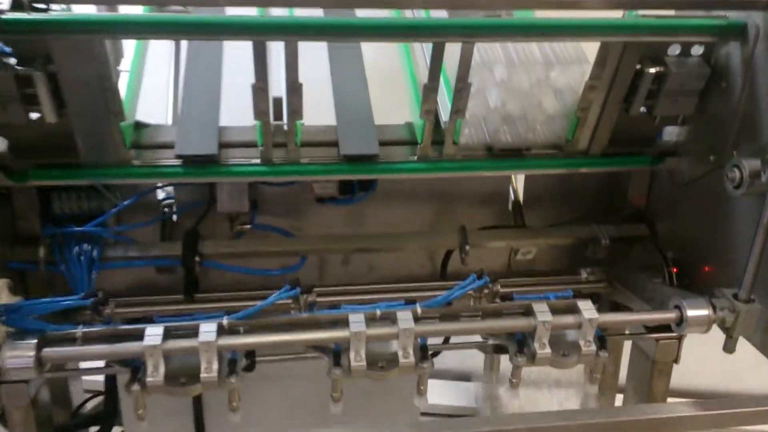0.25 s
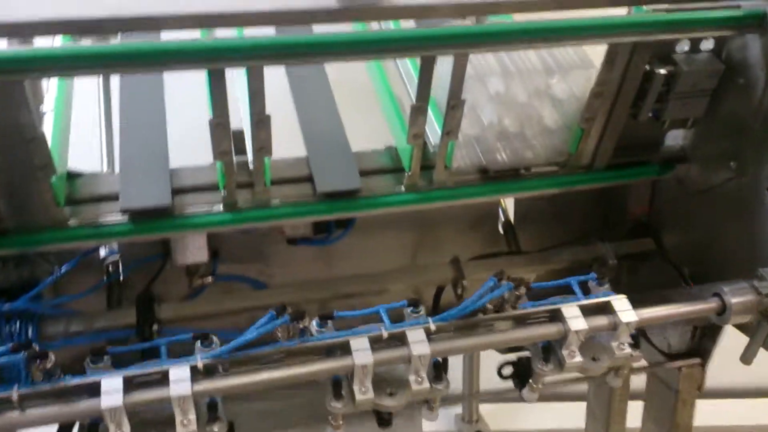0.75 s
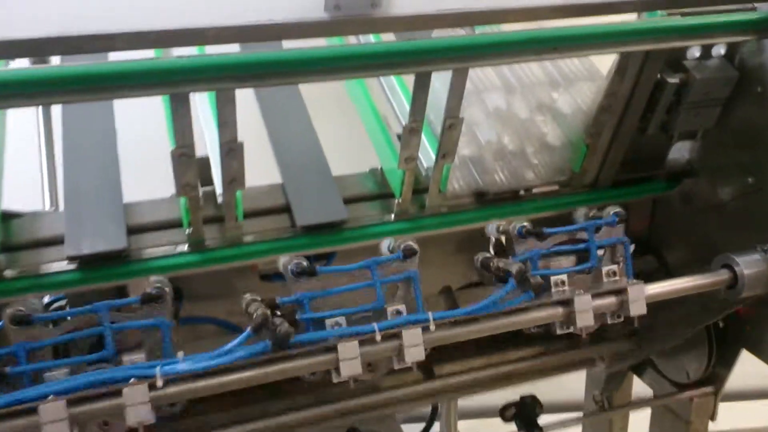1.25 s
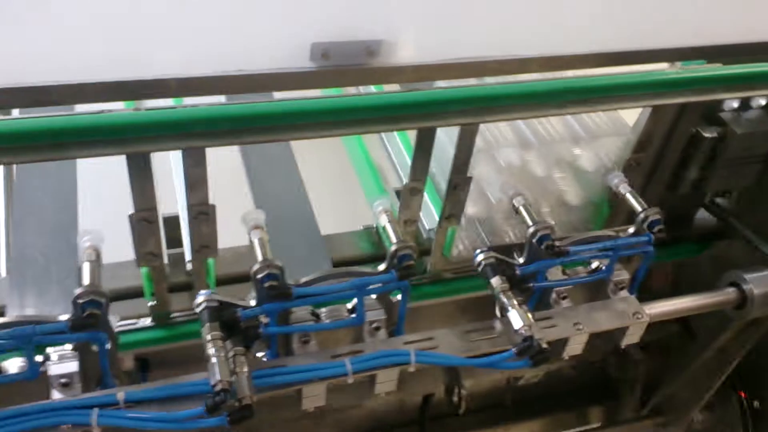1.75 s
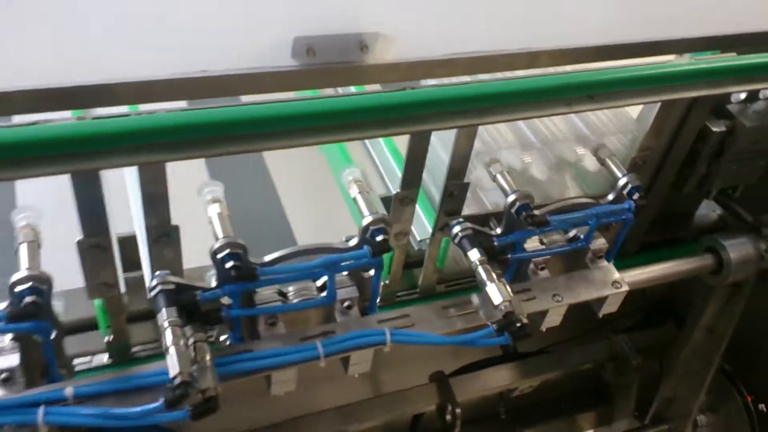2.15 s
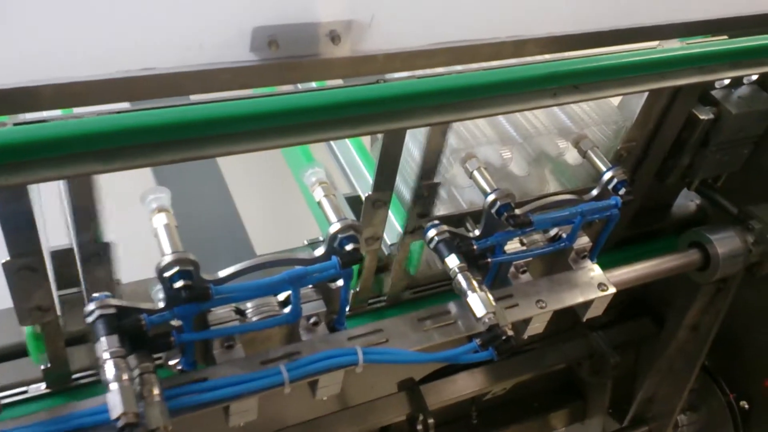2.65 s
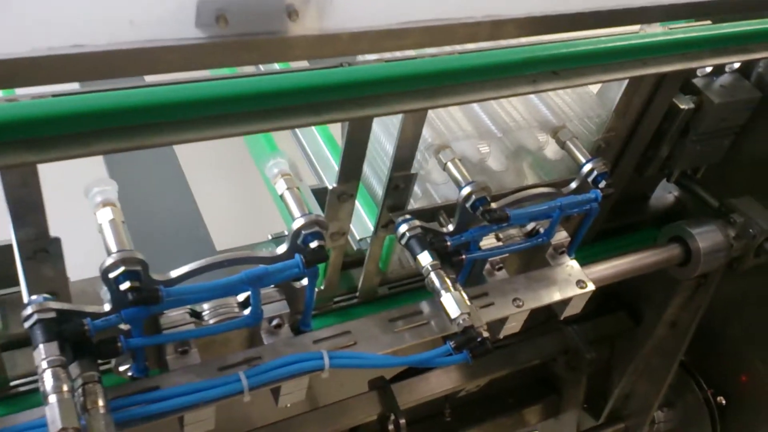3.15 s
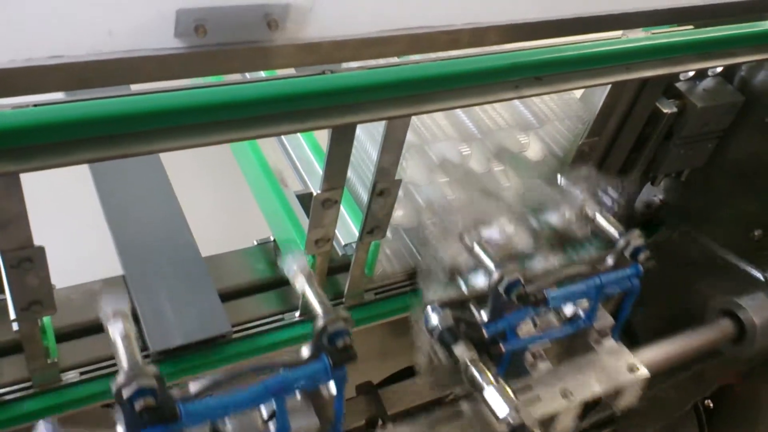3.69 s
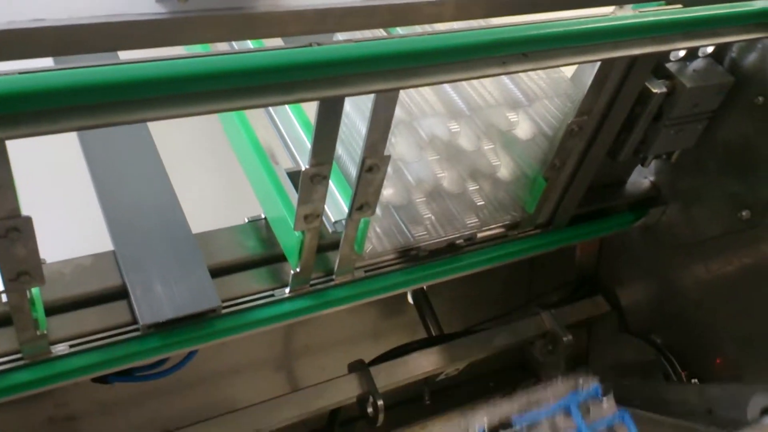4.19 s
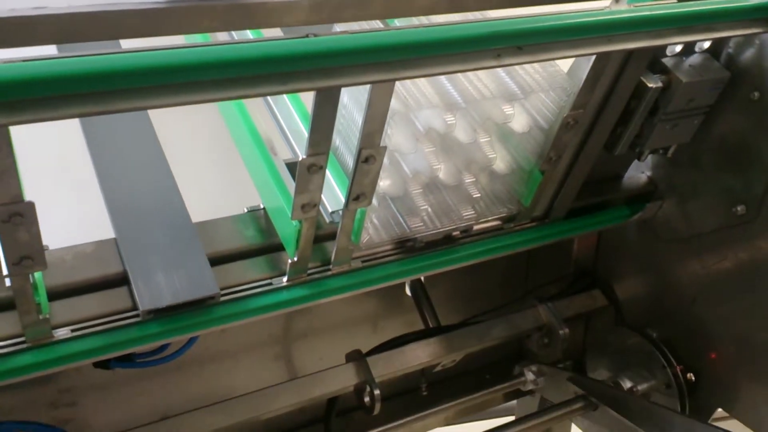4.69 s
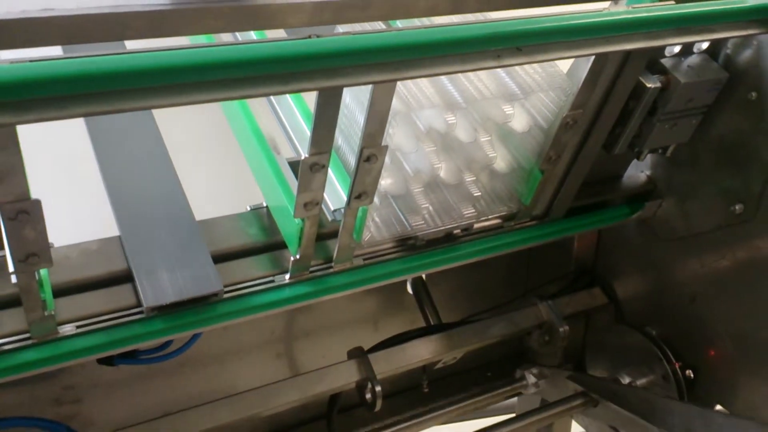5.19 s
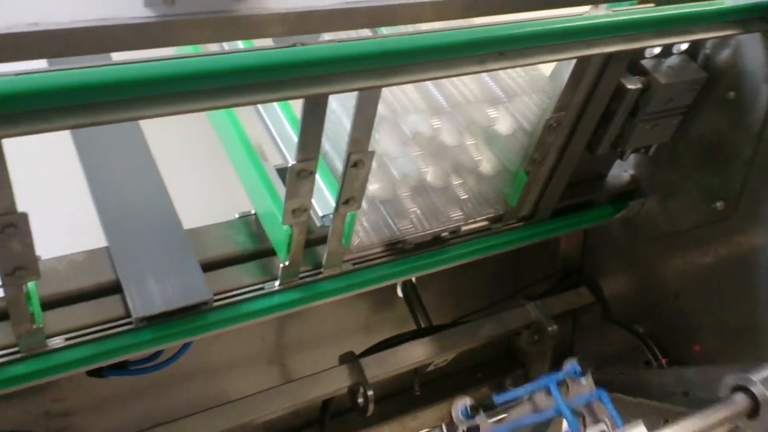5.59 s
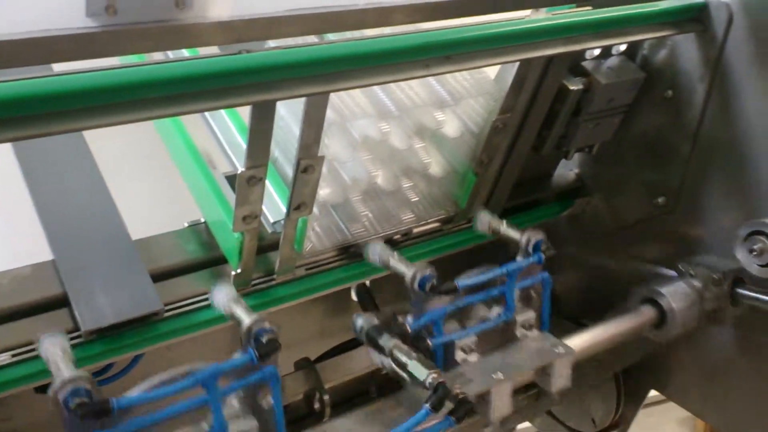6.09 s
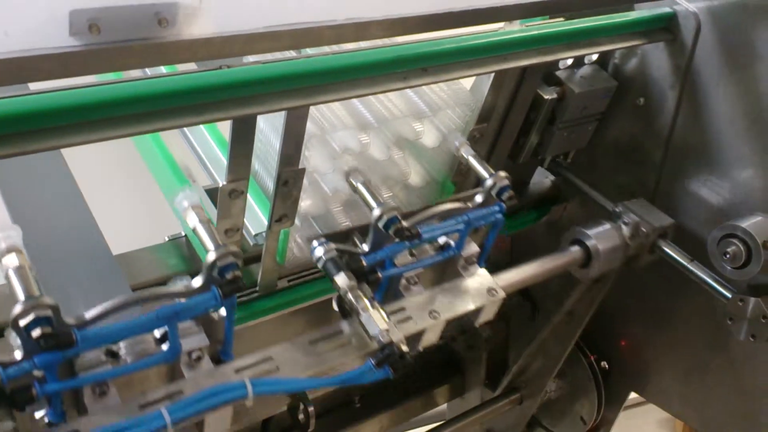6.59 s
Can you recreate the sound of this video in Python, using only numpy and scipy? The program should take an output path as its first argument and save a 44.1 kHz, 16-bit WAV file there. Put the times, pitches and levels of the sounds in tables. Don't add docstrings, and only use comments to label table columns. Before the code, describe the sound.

A pneumatic machine works at arm's length in a workshop. A faint air hiss cuts off with a puff and tap; a pair of puffs with clacks follows, then near quiet. Midway, loud air blasts and hard knocks erupt, leaving a steady bright hiss over low drive hum. It stops with a clack, followed by softer exhaust puffs and tiny ticks. Handheld stereo phone, short metallic echo.

```python
import sys
import numpy as np
from scipy import signal
from scipy.fft import rfft, irfft
from scipy.io import wavfile
from scipy.ndimage import uniform_filter1d

SR = 44100
rng = np.random.default_rng(int(sys.argv[2]) if len(sys.argv) > 2 else 0)


def unload_audio(sound):
    columns = np.transpose(np.atleast_2d(sound))
    steps = np.round(np.clip(columns, -1, 1) * 32767)
    wavfile.write(sys.argv[1], SR, steps.astype(np.int16))


def convert_level_to_amplitude(level_db):
    exponent = np.asarray(level_db, float) / 20
    return 10 ** exponent


N = 301644
T = np.arange(N) / SR


def read(table, hz):
    f, v = np.transpose(table)
    return np.interp(np.log(hz + 1e-9), np.log(f), v)


def tint(x, table):
    n = x.shape[-1]
    return irfft(rfft(x) * convert_level_to_amplitude(read(table, np.fft.rfftfreq(n, 1 / SR))), n)


def unit(x):
    return x / np.sqrt(np.mean(x ** 2))


def band(x, lo_hz, hi_hz):
    return signal.sosfilt(signal.butter(3, [lo_hz, hi_hz], "band", fs=SR, output="sos"), x)


def walk(rate):
    k = int(SR / rate)
    held = np.repeat(rng.standard_normal(N // k + 1), k)
    return uniform_filter1d(uniform_filter1d(held, k), k)[:N]


def swell(start, end, rise, fall):
    return np.clip(np.minimum((T - start) / rise, (end - T) / fall), 0, 1)


def add(out, x, s):
    i = int(s * SR)
    out[:, i:i + x.shape[1]] += x[:, :N - i]


def air(size):
    # (frequency [Hz], coherence [0-1])
    alike = [(25, 0.62), (60, 0.74), (250, .93), (640, .6), (1400, 0.075), (16000, 0.011)]
    c = np.clip(read(alike, np.fft.rfftfreq(size, 1 / SR)), 0, 1)
    mid, side = rfft(rng.standard_normal((2, size))) * np.sqrt([(1 + c) / 2, (1 - c) / 2])
    return irfft(np.array([mid + side, mid - side]), size)


def patchy(x, lo_hz, hi_hz, count):
    log_hz = np.log(np.fft.rfftfreq(N, 1 / SR) + 1)
    place = np.interp(log_hz, np.log([lo_hz, hi_hz]), [0, count - 1])
    spectrum, out, flicker_db = rfft(x), 0, 1.3
    for k in range(count):
        share = np.clip(1 - abs(place - k), 0, 1)
        out = out + irfft(spectrum * share, N) * convert_level_to_amplitude(flicker_db * walk(13))
    return out


def ejectors():
    # (time [s], level [dB])
    supply = [
        [(0, -33), (.2, -32), (.235, -32.5)],
        [(2.69, -17.5), (2.8, -27), (3.15, -28), (3.6, -28.5), (4.1, -29), (4.5, -28.5), (4.965, -27)],
    ]
    # (frequency [Hz], spectral level [dB])
    jet_colour = [(290, -48), (500, -25.5), (716, -36.5), (1090, -17), (1240, -19.5), (1370, -8.5),
                  (1600, -21), (2290, -10.5), (3900, -5), (4250, -3.5), (4840, -4), (7660, 3), (8590, -2),
                  (9780, 0), (15500, -10)]
    shared_power, lag = .3, 18
    shared = rng.standard_normal(N)
    shared = np.array([shared, np.roll(shared, lag)])
    jet = np.sqrt(1 - shared_power) * air(N) + np.sqrt(shared_power) * shared
    jet = tint(jet, jet_colour)
    hiss = unit(patchy(band(jet, 2700, 14000), 3500, 14000, count=6))
    roar_db = -12
    roar = unit(band(jet, 340, 2914)) * convert_level_to_amplitude(0.8 * walk(37) + roar_db)
    out = 0
    for table in supply:
        s, db = np.transpose(table)
        on = swell(s[0] - .017, s[-1], 0.008, .006) ** 2
        out = out + on * convert_level_to_amplitude(np.interp(T, s, db) + 3.5) * (hiss + roar)
    return out


def vents(table, rise):
    out, t = np.zeros((2, N)), np.arange(SR // 2) / SR
    for s, db, low_db, high_db, t60 in table:
        colour = [(150, low_db - 12.5), (500, low_db), (1200, low_db + 9.0), (2600, 0.0048),
                  (7500, high_db + 4), (11000, high_db - 2.5), (16000, high_db - 24.5)]
        gas = tint(air(len(t)), colour)
        gas = gas / np.std(band(gas, 1300, 6850))
        sputter = convert_level_to_amplitude(2.3 * unit(uniform_filter1d(rng.standard_normal(len(t)), 90)))
        opening = np.minimum(t / rise, 1) ** 2
        decay = convert_level_to_amplitude(db - 8.0 - 60 * np.maximum(t - rise, 0) / t60)
        add(out, gas * sputter * opening * decay, s - .002)
    return out


def puffs():
    # (time [s], peak level [dB], low band [dB], high band [dB], t60 [s])
    vented = [(.2024, -16, 3.5, -9, 0.097), (.2268, -19.5, -10, 1.5, 0.14), (.7724, -23, -13, -6.5, 0.19),
              (.7898, -12.5, -13, -4, 0.14), (.8973, -19.5, -7.5, -5, 0.085),
              (1.3334, -33.5, -10.5, -15, 0.29), (2.6765, -3.5, -11.5, -1, .12),
              (2.687, -4, -14.5, -0.5, .16), (2.975, -8.5, -3.5, 5.5, 0.17),
              (3.0114, -9.5, -20.5, -24, 0.064), (3.0785, -2.5, -10.5, 1, 0.11),
              (3.4442, -17, -10, -3.5, 0.15), (3.4791, -21, -8, -8.5, 0.12), (4.9282, -14.5, 2, -5.5, .04),
              (4.9496, -13.5, -13, -8, 0.055), (5.1215, -24, -7.5, -9.5, 0.22),
              (5.127, -13, -5.5, -10.5, 0.18), (5.4844, -16.5, -6, -8.5, 0.21),
              (5.4955, -18, -5, -6.5, 0.14), (6.1249, -22, -7.5, -5, 0.086),
              (6.1915, -27.5, -9.5, -15, 0.061), (6.3342, -31.5, -10, -22.5, 0.032),
              (6.3604, -29.5, -5, -9, 0.053), (6.3979, -21.5, -12.5, -8, 0.11)]
    return vents(vented, rise=0.0048)


def sighs():
    # (time [s], peak level [dB], low band [dB], high band [dB], t60 [s])
    emptied = [(.8492, -27.5, -11.5, -15.5, 0.41), (1.1494, -57, -14, -22, 0.41),
               (1.37, -39, -14, -10, 0.26), (2.0735, -40, -20, -8.5, 0.25), (2.105, -42.5, -22, -25, 0.15),
               (2.15, -50, -15, -27, 0.34), (2.2706, -66, 35, -34, 0.19), (2.832, -15.5, -11, -6.5, .17),
               (5.2395, -28, -2.5, -14.5, 0.19), (5.3294, -51, -4.5, -5, .19),
               (5.595, -30.5, -3.5, -14, 0.32), (5.651, -47.5, -13, 3.5, .18), (5.7622, -39, -7, -12, 0.34),
               (6.2293, -44.5, -10, -11, .23), (6.4797, -43.5, -13, -9, 0.19)]
    return vents(emptied, rise=0.02)


def solenoids():
    # (time [s], peak level [dB], low band [dB], high band [dB])
    snaps = [(1.0379, -30.5, -25, -23), (1.713, -46.5, 10, 8), (2.2453, -33, -26.5, -1),
             (2.2994, -34.5, -3, -19), (2.9738, -9.5, -10.5, 3.5), (5.763, -38.5, -7, -17),
             (5.7808, -36, -22, -12), (6.0531, -39, 2, 5), (6.12, -20, -14, 7), (6.2232, -25.5, -11, -3),
             (6.2747, -34, -18, 1), (6.3266, -16.5, -23, -3), (6.4048, -21, -22, 13)]
    t60 = .038
    return vents([(*row, t60) for row in snaps], rise=0.00201)


def wheezes():
    # (start [s], end [s], centre [Hz], width [Hz], level [dB])
    flows = [(0.367, .66, 2400, 1200, -54.5), (0.293, 0.792, 746, 800, -60),
             (0.772, 0.878, 1320, 457, -28.5), (2.268, 2.37, 2040, 900, -46),
             (2.716, 2.734, 1200, 940, -46), (2.832, 2.915, 2530, 1390, -24),
             (2.832, 2.914, 420, 250, -33.5), (4.928, 5.012, 990, 780, -25.5),
             (5.137, 5.194, 1054, 442, -30), (5.133, 5.223, 319, 103, -42.5),
             (5.234, 5.29, 1210, 1190, -38), (5.488, 5.579, 1110, 480, -27), (5.489, 5.72, 306, 140, -42),
             (5.771, 5.827, 3800, 2300, -42.5), (5.658, 6.15, 330, 260, -50),
             (6.403, 6.593, 677, 398, -52.5), (6.55, 6.95, 322, 266, -59)]
    out, size = np.zeros((2, N)), SR // 2
    for start, end, hz, width, db in flows:
        i, length = int(start * SR), end - start
        shape = swell(start, end, 0.074 * length, 0.68 * length)[i:i + size] ** 2
        noise = unit(band(air(size), hz - width / 2, hz + width / 2))
        add(out, noise[:, :len(shape)] * shape * convert_level_to_amplitude(db), start)
    return out


def knocks(table, crack_db):
    out, t = np.zeros((2, N)), np.arange(SR // 5) / SR
    modes = [(0.987, 0.97), (1.22, 0.26), (0.98, 0.18), (1.9, 0.35)]
    for s, db, hz, pan_db, t60 in table:
        ring = 0
        for ratio, gain in modes:
            ring = ring + gain * convert_level_to_amplitude(-60 * ratio * t / t60) * np.sin(2 * np.pi * ratio * hz * t)
        ring = ring * np.minimum(t * hz * 2, 1)
        crack = convert_level_to_amplitude(crack_db - 60 * t / 0.02) * band(rng.standard_normal(len(t)), 1600, 8400)
        sides_db = np.array([[pan_db + 3.5], [-pan_db - 5.5]]) / 2
        add(out, (ring + crack) * convert_level_to_amplitude(db + sides_db), s + 0.002246)
    return out


def thuds():
    # (time [s], peak level [dB], ring [Hz], left minus right [dB], t60 [s])
    heavy = [(.202, -15, 550, -6, 0.032), (.227, -39, 470, -4, .03), (2.142, -42, 736, -7, 0.059),
             (2.676, -13.5, 288, -8, 0.018), (2.767, -9, 510, -8, 0.016), (2.972, -7, 374, -6, 0.012),
             (2.988, -18, 424, -17.5, 0.039), (3.079, -11.5, 390, 4, .02), (4.804, -34.5, 370, 0, 0.068),
             (4.925, -8.5, 522, -8.5, 0.02), (4.939, -17.5, 396, -0.5, 0.024)]
    return knocks(heavy, crack_db=-18)


def clacks():
    # (time [s], peak level [dB], ring [Hz], left minus right [dB])
    light = [(0.2291, -18.5, 2250, 0), (.79, -14.5, 2330, -1), (0.8116, -21, 1160, -8.5),
             (0.8975, -20.5, 1400, -2), (0.9133, -29.5, 1660, -2.5), (2.142, -39.5, 1370, -15),
             (2.244, -39, 2420, -6.5), (2.2973, -32, 1850, -10), (2.6776, -5, 1450, -13),
             (2.9769, -20.5, 1410, -5.5), (3.0816, -5, 2500, -6), (3.0895, -11.5, 2370, -16),
             (4.9275, -12.5, 1445, -9.5), (5.1262, -16, 1055, -5.5), (5.496, -12.5, 1137, -3),
             (5.5048, -15, 1250, -4.5), (5.5194, -21.5, 880, -9), (6.122, -29, 2570, 7),
             (6.4034, -32.5, 1830, 0.5)]
    t60 = 0.019
    return knocks([(*row, t60) for row in light], crack_db=-3.5)


def drive():
    # (start [s], end [s], pitch [Hz], level [dB])
    drones = [(0, 0.148, 157, -49), (0.554, .7, 155.5, -52.5), (2.859, 3.002, 96.8, -30.5),
              (3.05, 3.24, 97, -30), (3.165, 3.444, 98, -38), (3.1, 3.7, 153.2, -50),
              (3.48, 4.373, 249.4, -47.5), (4.272, 4.366, 410, -40), (4.294, 4.6, 281, -52),
              (4.664, 4.906, 150.4, -45.5), (5.255, 5.456, 152.5, -53), (6.535, 6.637, 195, -53),
              (6.637, 6.728, 191.4, -43.5)]
    out, waver = np.zeros(N), 1 + 0.01586 * walk(8.1) + .012 * walk(45)
    flutter = convert_level_to_amplitude(3.5 * walk(22))
    for start, end, hz, db in drones:
        tone = np.sin(2 * np.pi * np.cumsum(hz * waver) / SR)
        out += swell(start, end, .03, 0.1) * convert_level_to_amplitude(db) * tone
    return out * flutter


def frame(x):
    # (frequency [Hz], t60 [s])
    frame_t60 = [(250, 0.42), (1000, 0.34), (3000, 0.38), (8000, 0.18)]
    t, out = np.arange(SR // 2) / SR, 0
    for share in (np.cos(1.577 * T), np.sin(1.638 * T)):
        echo = 0
        for hz in 70 * 2. ** np.arange(8):
            echo = echo + band(air(len(t)), hz, 2 * hz) * convert_level_to_amplitude(-60 * t / read(frame_t60, hz))
        echo = echo * np.minimum(t / 0.00099, 1)
        echo = echo / np.sqrt(np.sum(echo ** 2) / 2)
        out = out + signal.fftconvolve(x * share, echo, axes=1)[:, :N]
    return out


def shop():
    # (time [s], level [dB])
    drive_load = [(0, -51.5), (.6, -54), (1.2, -53.5), (1.6, -56), (2.13, -47), (2.6, -57), (2.7, -49),
                  (2.91, -31.5), (3.1, -35), (3.45, -44.5), (3.75, -43.5), (4.06, -47.5), (4.57, -44),
                  (5.07, -55), (5.5, -50), (5.9, -49), (6.5, -52), (6.84, -48)]
    # (frequency [Hz], spectral level [dB])
    far_colour = [(120, -22), (200, -5), (450, -9.5), (800, -8), (1200, -13), (1700, -20), (2300, -15.5),
                  (3000, -22), (6000, -27), (10000, -26.5), (15500, -39.5)]
    # (time [s], level [dB])
    leak = [(0, -60.5), (1.4, -63.5), (1.6, -69.5), (1.75, -62), (2.3, -61.5), (2.45, -73.5), (2.7, -68.5),
            (5.0, -60.5), (6.84, -62)]
    # (low edge [Hz], high edge [Hz], level at idle [dB], slope [dB per dB of load])
    shaken = [
        (13.98, 35, -53.5, 0.21),
        (56.5, 87.8, -57, 0.9456),
        (125, 210, -65.5, 1.23),
    ]
    # (time [s], level [dB])
    hand = [(.27, -36.5), (.51, -43.5), (.68, -39), (1.18, -51), (1.4, -41), (1.83, -42), (2.13, -45),
            (2.699, -30.5), (2.99, -40), (3.12, -36), (3.68, -46), (4.25, -46), (4.95, -41), (5.411, -46.5),
            (6.04, -44.5)]
    idle_db, wash_db, wash_per_load, jolt_s = -54, -58, 0.61, .032
    load = np.interp(T, *np.transpose(drive_load)) - idle_db
    far = tint(air(N), far_colour)
    out = unit(band(far, 220, 2800)) * convert_level_to_amplitude(wash_db + wash_per_load * load + 1.5 * walk(6))
    out = out + unit(band(far, 2300, 9300)) * convert_level_to_amplitude(np.interp(T, *np.transpose(leak)))
    out = out + unit(band(air(N), 9000, 16000)) * convert_level_to_amplitude(-85)
    for lo, hi, db, slope in shaken:
        out = out + unit(band(air(N), lo, hi)) * convert_level_to_amplitude(db + slope * load + 2.8 * walk(10))
    jolts = sum(convert_level_to_amplitude(db) * np.exp(-((T - s) / jolt_s) ** 2) for s, db in hand)
    return out + jolts * unit(band(air(N), 7.6, 56))


def scene():
    jets = ejectors()
    gas = puffs() + sighs()
    ticks = solenoids()
    blows = thuds() + clacks()
    sent = convert_level_to_amplitude(-13) * jets + convert_level_to_amplitude(-6.5) * gas + convert_level_to_amplitude(-11.5) * ticks + convert_level_to_amplitude(-18) * blows
    wet = frame(np.sum(sent, axis=0, keepdims=True))
    return convert_level_to_amplitude(1.0) * jets + gas + ticks + blows + wet + wheezes() + drive() + shop()


def band_limit(x):
    return signal.sosfilt(signal.butter(12, 15630, fs=SR, output="sos"), x)


def record(dry):
    # (frequency [Hz], left minus right [dB])
    port_colour = [(60, -2), (400, -4.5), (900, -2), (1400, -5.5), (2100, -9.5), (2700, -4.5), (3450, -6.5),
                   (5000, -3), (7200, -7), (8600, 0.5), (9800, 6), (12000, 1.5), (15000, 1)]
    half = np.array(port_colour) * [1, .5]
    left = signal.lfilter(*signal.butter(1, 35, "high", fs=SR), dry[0])
    mix = np.array([tint(left, half), tint(dry[1], half * [1, -1])])
    mix = np.clip(mix, -1, 1)
    return band_limit(mix)


dry = scene()
out = record(dry)
unload_audio(out)
```